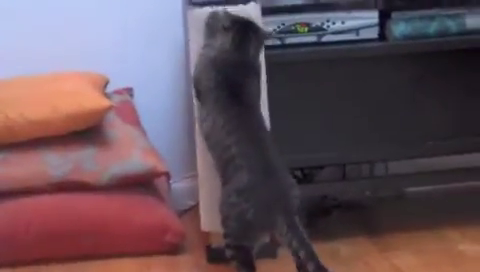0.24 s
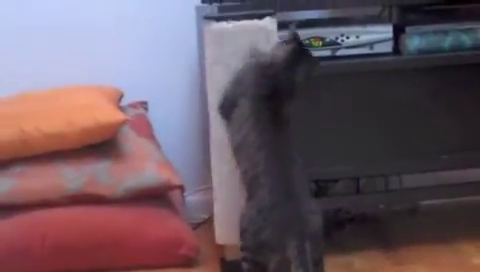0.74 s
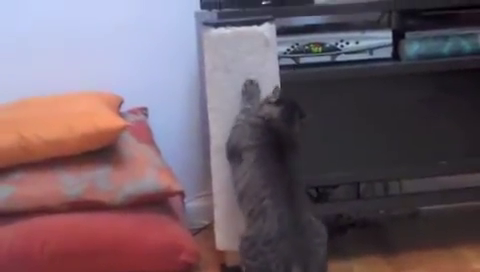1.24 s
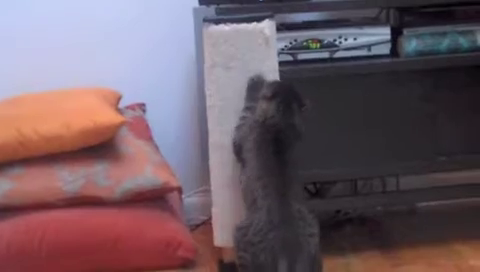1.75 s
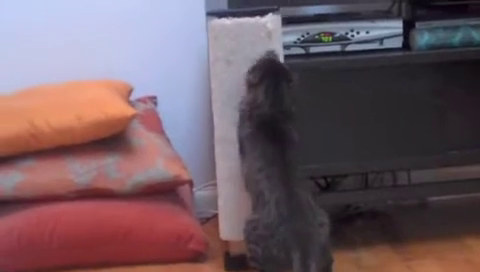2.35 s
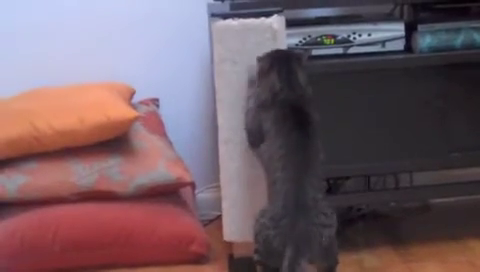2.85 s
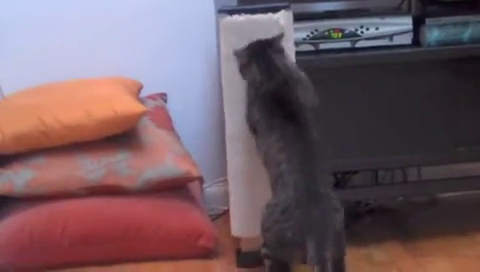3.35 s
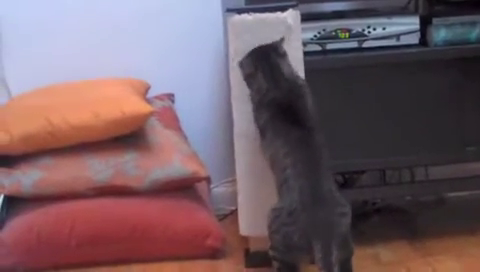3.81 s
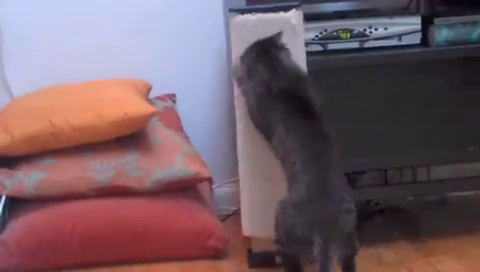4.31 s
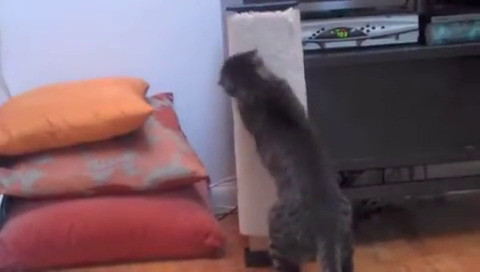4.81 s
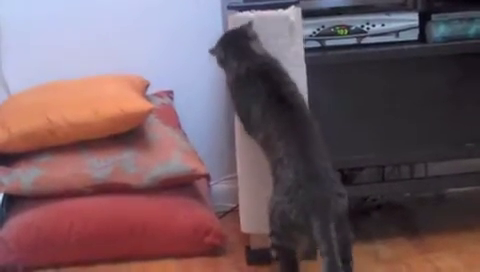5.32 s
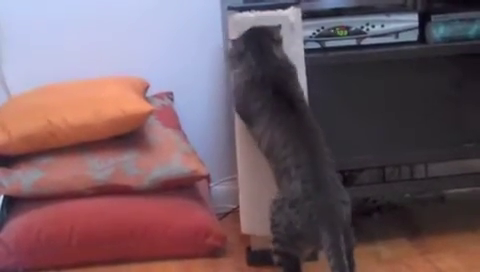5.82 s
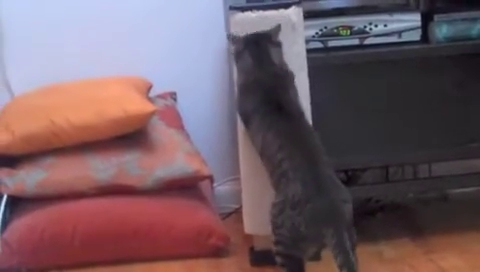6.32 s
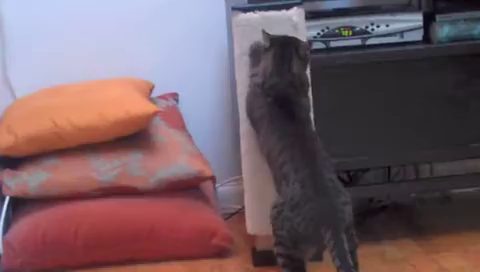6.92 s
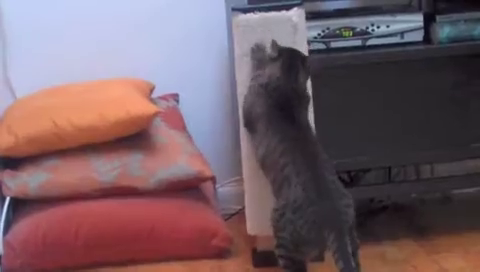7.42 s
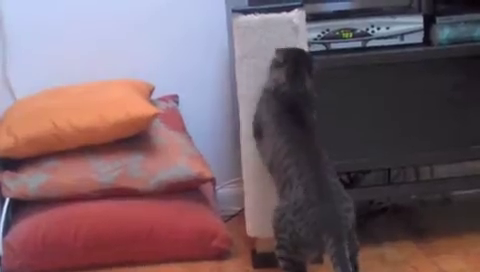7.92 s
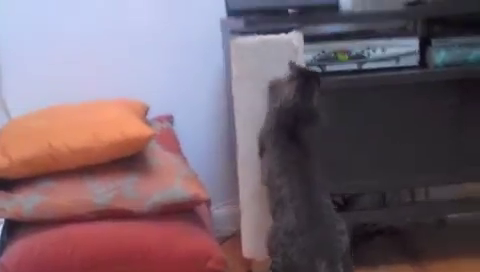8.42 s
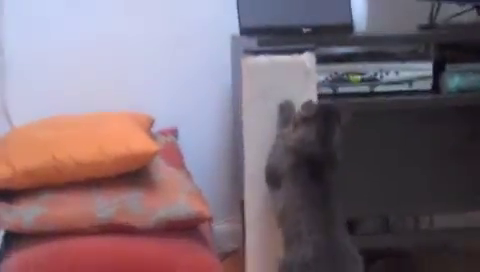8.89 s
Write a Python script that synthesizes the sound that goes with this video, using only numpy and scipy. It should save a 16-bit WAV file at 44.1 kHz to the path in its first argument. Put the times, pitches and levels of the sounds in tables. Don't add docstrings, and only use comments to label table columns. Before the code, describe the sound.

A cat claws a carpeted post indoors: irregular snaps and ticks of catching claws, hollow woody thumps, faint fibre scuffs, over quiet room hush.

```python
import sys
import numpy as np
from scipy import signal
from scipy.fft import rfft, irfft
from scipy.io import wavfile
from scipy.ndimage import uniform_filter1d

SR = 44100
rng = np.random.default_rng(int(sys.argv[2]) if len(sys.argv) > 2 else 0)


def materialize(psi):
    bounded = np.clip(np.atleast_2d(psi).T, -1, 1)
    quanta = np.round(bounded * 32767).astype(np.int16)
    wavfile.write(sys.argv[1], SR, quanta)


def ratio(d):
    e = np.asarray(d, float) / 20
    return 10 ** e


N = 403515

# start_s, blow_db, edge_db, cabinet_boom_db, length_ms
PULLS = [
    (0.249, -14, -18.5, -32, 6.8),
    (0.861, -6.5, -18.5, -39, 3.3),
    (2.8702, -12.5, -10, -35, 3.1),
    (3.4907, -10.5, -14.5, -36.5, 2),
    (4.283, -13, -14.5, -35.5, 6.9),
    (5.461, -15, -15, -40, 2),
    (6.116, -15, -17, -36.5, 2.1),
    (8.43, -10, -14, -35, 1.8),
]
# start_s, blow_db, board_db, edge_db, cabinet_boom_db
PAWS = [(0.001, -32.5, -16, -12.5, -35), (0.034, -37, -13, -21, -15), (1.692, -27.5, -16, -27, -42),
        (1.817, -40, -32, -1.5, -26), (1.989, -40.5, -6.5, -11, -36), (2.17, -28.5, -11, -10, -38),
        (2.473, -38, -9.5, 0.5, -28), (2.605, -35, -12, 2, -20), (4.241, -29, -17, -4.5, -35),
        (4.603, -35, -20, -5, -16), (4.667, -31.5, -11, -7.5, -34), (5.133, -27, -22, -8, -35),
        (5.1937, -32, -15.5, 0, -27), (6.091, -25, -24, -4.5, -37), (7.156, -31.5, -6.5, -9, -26),
        (7.711, -32.5, -26, -3, -29), (7.888, -28.5, -10, -9, -54), (8.15, -33, -13.5, -4.5, -29),
        (8.195, -34.5, -9, -9.5, -33), (8.384, -29, -14.5, -8, -21)]
SLID_DOWN_S = 1.2


def evened(x):
    return x / np.sqrt(np.mean(x ** 2) + 1e-20)


def read(points, hz):
    f, value = np.transpose(points)
    return np.interp(np.log(hz + 1), np.log(f + 1), value)


def over_time(points):
    s, level_db = np.transpose(points)
    return ratio(np.interp(np.arange(N) / SR, s, level_db))


def add(mix, s, sound):
    part = mix[max(round(s * SR), 0):][:len(sound)]
    part += sound[:len(part)]


def high_pass(x, order, hz):
    return signal.sosfilt(signal.butter(order, hz, "high", fs=SR, output="sos"), x)


def causal(gain_db):
    hz = abs(np.fft.fftfreq(4096, 1 / SR))
    log_gain = np.log(ratio(np.maximum(gain_db(hz), -100)))
    return np.fft.ifft(np.exp(np.conj(signal.hilbert(log_gain)))).real[:2048]


def ringing(modes, seconds):
    t = np.arange(round(seconds * SR)) / SR
    x = sum(ratio(db) * np.exp(-np.pi * width * t) * np.sin(2 * np.pi * hz * t) for hz, width, db in modes)
    return x / np.linalg.norm(x)


def ticks():
    # start_s, peak_db, pitch_hz, fade_cycles
    twangs = [(0.2512, -17, 3900, 3.6), (0.2534, -21, 5170, 3.6), (0.255, -18, 1800, 1.8),
              (0.8618, -3, 3000, 1.5), (0.8632, -11.5, 1490, 1.7), (0.8666, -2.5, 4480, 0.89),
              (0.8772, -9, 2200, 1.4), (1.6972, -33, 4470, 3), (1.713, -27, 3570, 2.5),
              (2.604, -29, 3300, 3), (2.6052, -23, 4420, 1.5), (2.6067, -31, 2640, 2.5),
              (2.6062, -34.5, 1470, 3), (2.6126, -25, 3900, 3), (2.6128, -26.5, 5950, 3.3),
              (2.6158, -26, 3600, 1.3), (2.6195, -43, 4200, 3), (4.2354, -29, 1700, 2),
              (4.5925, -37, 990, 1.7), (5.1318, -29, 1610, 3), (5.1323, -29, 5000, 1.5),
              (5.137, -31, 4940, 4), (5.1393, -24, 1600, 2.7), (5.1405, -25, 4660, 1.9),
              (5.1438, -25, 5250, 2.4), (5.1498, -30, 1510, 2.3), (5.15, -30, 4570, 2.7),
              (5.1917, -29, 1610, 3.6), (5.198, -28, 5240, 2.7), (6.0895, -24, 1690, 3.3),
              (6.0894, -23, 4340, 2.7), (6.095, -24, 2920, 3), (6.0952, -26, 1500, 4),
              (6.0992, -26, 4580, 3), (6.099, -27, 1600, 3), (7.7089, -28.5, 1170, 1.3),
              (7.7095, -31, 2770, 1.7), (7.8595, -31.5, 5700, 3), (7.859, -34, 2580, 3),
              (7.8905, -28, 1890, 2.8), (8.15, -32, 3200, 1.8), (8.1638, -41, 3280, 2.8),
              (8.169, -34, 1200, 1.6), (8.202, -23.5, 750, 2), (8.3853, -20, 1720, 1.5),
              (2.5958, -35, 3060, 5), (5.1925, -33, 3000, 1.8), (8.7075, -41, 6600, 2.7),
              (8.838, -48, 6200, 3), (8.961, -49, 8300, 4)]
    # delay_ms, level_db
    tick_echoes = [(.8, -7), (1.7, -15), (2.8, -15), (15.5, -18)]
    ring_cycles, ring_pitch_hz, ring_power = .46, 3500, .2
    after_db, after_cycles = -7, 1.7
    twang_room_db = -7.5
    near, far, t = np.zeros(N), np.zeros(N), np.arange(400) / SR
    for s, db, hz, room_db in claws():
        age = t * hz / (ring_cycles * (hz / ring_pitch_hz) ** ring_power)
        wave = np.cos(2 * np.pi * hz * t)
        snap = wave * (age * np.exp(-age)) ** 3
        snap = ratio(db - 1.5) * snap / abs(snap).max()
        after = ratio(after_db) * np.minimum(age / 2, 1) * np.exp(-t * hz / after_cycles) * wave
        add(near, s, snap + ratio(db) * after)
        add(far, s, ratio(room_db + 5.5) * snap)
    near, far = high_pass([near, far], 2, 1900)
    for s, db, hz, cycles in twangs:
        twang = ratio(db) * np.exp(-t * hz / max(cycles, .3)) * np.sin(2 * np.pi * hz * t)
        add(near, s, twang)
        add(far, s, ratio(twang_room_db) * twang)
    near, far = high_pass([near, far], 3, 800)
    room = tail(start_ms=0.52, rise_ms=2.3, early_db=5.0, lumpy_db=4.0)
    return through(near, echoes(tick_echoes)) + through(far, room)


def claws():
    # start_s, peak_db, pitch_hz, room_share_db
    snaps = [(0.0104, -29, 3230, -12), (0.0191, -14.5, 2740, -4), (0.0237, -22, 6240, -7),
             (0.2216, -20, 2780, 2.5), (0.6164, -22.5, 3550, -22), (0.7003, -32, 4070, -2),
             (0.8106, -11.5, 3400, -8), (1.6926, -20, 2900, 1), (2.4732, -22, 3060, -30),
             (2.5971, -36, 3480, -3), (2.8303, -25.5, 3150, -2), (3.3434, -29.5, 4180, -12),
             (3.3535, -30, 3900, -14), (3.4488, -23, 3260, -1), (4.2436, -17.5, 3330, -23),
             (4.5918, -24, 4250, -8), (4.8085, -31, 4770, -8), (5.1473, -24.5, 3300, 1),
             (5.1922, -23, 3490, -6), (7.0445, -22.5, 4230, -2.5), (7.124, -23, 4040, -2),
             (7.1544, -29, 3550, -21), (7.8466, -33, 3330, 6), (7.8595, -34, 3930, -1),
             (7.8893, -27, 2890, -21), (8.1637, -36, 3540, 3.5), (8.3715, -21.5, 3100, -2),
             (8.38, -19.5, 2850, -21), (0.8138, -25, 6500, -15), (0.8603, -15, 4300, -18),
             (0.8622, 1, 5270, -20)]
    # start_s, length_ms, peak_db, pitch_hz, room_share_db
    rips = [(0.037, 2.7, -28, 3760, -12), (0.6073, 1.6, -24.5, 3600, -2.5), (0.755, 5.5, -28.5, 3880, -6),
            (0.799, 2.6, -32, 3520, 5.5), (1.6886, 4.9, -32, 3400, -19), (1.8172, 2.5, -27, 2880, -4),
            (2.17, 3.5, -26.5, 3560, -23), (2.334, 2.7, -40, 3040, -1), (3.3016, 11, -42, 4350, -19),
            (4.0348, 11.6, -44, 4370, -4), (4.2358, 10.4, -25.5, 4000, -4), (4.6028, 2.2, -20, 4930, -3),
            (4.6149, 2.6, -31, 4200, -8), (4.6674, 3.6, -29, 2780, -18), (6.9011, 2.4, -44.5, 4300, 1),
            (7.7072, 2.17, -22.5, 2820, -22)]
    # start_s, peak_db, pitch_hz
    pricks = [(0.075, -28, 3670), (0.4667, -32, 3770), (0.486, -33.5, 3830), (0.5376, -40, 3340),
              (1.5887, -44, 2750), (1.6145, -42, 2490), (1.6356, -38, 4130), (1.6656, -38, 4000),
              (1.9886, -34, 3160), (2.0684, -37, 4060), (2.0821, -32, 4000), (2.1244, -35.5, 3870),
              (2.566, -43, 3330), (3.1279, -36, 3030), (3.3955, -35, 3910), (3.9566, -39.5, 3870),
              (4.0845, -39, 4000), (4.19, -38.5, 4870), (4.587, -27, 4050), (5.4313, -44, 3430),
              (6.034, -36, 2930), (6.5518, -35.5, 2230), (6.6446, -35, 2080), (6.953, -46, 3960),
              (7.1102, -34, 2840), (7.424, -42, 2230), (8.044, -30, 4170), (8.1509, -44, 2700),
              (8.1954, -39, 2700), (8.353, -42, 2940)]
    prick_room_db = -1.5
    claw_gap_ms, claw_db_spread, claw_pitch_spread = 3.1, 3.0, .18
    out = snaps + [(*row, prick_room_db) for row in pricks]
    chances = rng.uniform(-1, 1, (len(rips), 8, 3))
    for (s, ms, db, hz, room_db), chance in zip(rips, chances):
        count = 1 + int(np.clip(round(ms / claw_gap_ms), 1, 7))
        uneven = .3 * chance[:count, 0] * np.sin(np.linspace(0, np.pi, count))
        place = (np.arange(count) + uneven) / (count - 1)
        for p, (_, louder, higher) in zip(place, chance):
            pitch_hz = hz * (1 + claw_pitch_spread * higher)
            out.append((s + p * ms / 1000, db + claw_db_spread * louder, pitch_hz, room_db))
    return out


def knocks():
    # pitch_hz, density_db per Hz
    post = [(65, -28), (110, -8), (428, -0.5), (589, -1), (677, 2), (763, -3.5), (913, 4), (1470, 4),
            (1770, 5.5), (2740, -1), (5400, -23), (9260, -30.5), (13000, -45.5)]
    # pitch_hz, density_db per Hz
    post_top = [(65, -33), (110, -10.5), (300, -8.5), (420, -4), (560, -10), (950, -2.5), (1070, -4),
                (1500, -6.5), (1660, -1.5), (2530, -8), (4340, -10), (9640, -29), (13000, -45)]
    # pitch_hz, share
    board = [(100, 1), (600, 1), (1100, 0)]
    # pitch_hz, share
    edge = [(2200, 0), (4500, 1), (16000, 1)]
    # pitch_hz, density_db per Hz
    claw_colour = [(1500, -38), (3500, 0), (6500, 15), (10000, 10.5), (16000, -44)]
    # pitch_hz, width_hz, level_db
    boom_modes = [
        [(50.5, 2.16, -2), (38.5, 2.4, -7)],
        [(63.5, 6.4, 15)],
    ]
    # delay_ms, level_db
    knock_echoes = [(2.8, 2), (4.1, -2), (5.3, -2), (7.2, -5), (15.5, -7), (18.3, 1), (22, -5), (34.5, -3)]
    pull_board_db = [-17.5, -18.5, -17.5, -18.5, -19.5, -18.5, -19, -16.5]
    plain_board_db, plain_edge_db = -23, -21
    paw_ms, paw_flick_db = 2.56, -5
    soft_below_db, softening, shadow_db = -15, .25, 5.5
    first_wall_ms, room_fill_ms = 3, 12
    near, flick, boom, *wood = np.zeros((6, N))
    claw = causal(lambda hz: read(claw_colour, hz))
    swing = ringing(boom_modes[0], .6) - ringing(boom_modes[1], .6)
    blows = [(s, db, board_db, edge_db, boom_db, ms)
             for (s, db, edge_db, boom_db, ms), board_db in zip(PULLS, pull_board_db)]
    blows += [(*paw, paw_ms) for paw in PAWS]
    for k, (s, db, board_db, edge_db, boom_db, ms) in enumerate(blows):
        colour = post_top if s < SLID_DOWN_S else post
        plain = np.linalg.norm(causal(lambda hz: read(colour, hz)))
        low_db, high_db = board_db - plain_board_db, edge_db - plain_edge_db
        blow = causal(lambda hz: read(colour, hz) + low_db * read(board, hz) + high_db * read(edge, hz))
        sound = ratio(db + 2.0) * signal.fftconvolve(chatter(ms), blow / plain)
        add(wood[k % len(wood)], s - .001, sound)
        add(near, s - .001, ratio(shadow_db + softening * min(db - soft_below_db, 0)) * sound)
        is_paw = k >= len(PULLS)
        add(flick, s - .001, ratio(db + edge_db + 4 + paw_flick_db * is_paw) * claw)
        add(boom, s, ratio(db + boom_db + 35.5) * swing)
    room = sum(through(spot, tail(first_wall_ms, room_fill_ms, early_db=5.0, lumpy_db=5.5)) for spot in wood)
    near = high_pass(near, 1, 350)
    return through(near, echoes(knock_echoes)) + ratio(15.5) * room + [flick, np.roll(flick, 1)] + boom


def chatter(ms):
    fade = np.exp(-1000 * np.arange(2048) / SR / max(ms, .3))
    chance, size = rng.random(2048), rng.standard_normal(2048)
    blows = np.append(1.2, (size * (chance < .15))[1:])
    for _ in range(4):
        z = rfft(blows * np.sqrt(fade))
        blows = irfft(z / abs(z))
    return blows[:1024]


def slaps():
    slap_ms, late_ms = .7, 1.05
    out, t = np.zeros(N), np.arange(400) / SR
    age = 1000 * t / slap_ms
    swell = (age * np.exp(1 - age)) ** 2
    for s, db, *_ in PULLS:
        hz, slap_db = (2700, -5) if s < SLID_DOWN_S else (1780, 0)
        add(out, s + late_ms / 1000, ratio(db + slap_db) * swell * np.sin(2 * np.pi * hz * t))
    return out


def panels():
    # pitch_hz, width_hz, level_db
    panel_modes = [(275, 5, -4), (337, 7, -4), (424, 6, -1), (665, 7, -1), (723, 7, -3), (819, 7, -3),
                   (905, 8, -2), (1320, 8, -4), (1552, 7, -2), (1717, 6, 0), (1752, 6, 1), (1878, 6, -1),
                   (2290, 6, -3), (2650, 6, -4)]
    panel_db, spread_db, rise_ms = 11, 4, 6
    out, t = np.zeros(N), np.arange(round(.3 * SR)) / SR
    rise = 1 - np.exp(-1000 * t / rise_ms)
    blows = PULLS + PAWS
    chances = rng.standard_normal((len(blows), len(panel_modes), 2))
    for (s, db, *_), chance in zip(blows, chances):
        modes = [(hz * (1 + .002 * a), width, own_db + spread_db * b)
                 for (hz, width, own_db), (a, b) in zip(panel_modes, chance)]
        add(out, s, ratio(db + panel_db) * rise * ringing(modes, .3))
    return out


def drag():
    # pitch_hz, density_db per Hz
    pile = [(1500, -15.5), (2800, -3.5), (4000, -0.5), (5500, -2), (8000, -10), (11000, -18.5),
            (15000, -50)]
    size = ratio(9.2 * np.minimum(rng.exponential(1, N), 5)) * rng.choice([-1., 1.], N)
    clicks = size * (rng.random(N) < 1500 / SR)
    hiss = signal.oaconvolve(clicks, causal(lambda hz: read(pile, hz)))[:N]
    fibres = ratio(-1.5) * pressure() * evened(hiss)
    return 0.13 * fibres + through(fibres, tail(start_ms=2.8, rise_ms=8.3, early_db=-13.0, lumpy_db=7.5))


def pressure():
    # start_s, hold_s, level_db
    strokes = [(0.0, 0.01, -57), (0.27, 0.03, -57), (0.45, 0.3, -60.5), (0.88, 0.09, -59),
               (2.163, 0.035, -60), (2.403, 0.23, -62), (2.86, 0.038, -54.5), (3.303, 0.045, -55.5),
               (4.2, 0.32, -67.5), (5.477, 0.04, -60), (7.12, 0.11, -60.5), (7.906, 0.25, -62),
               (8.387, 0.077, -52.5), (8.75, 0.37, -64.5)]
    press_db_per_s, lift_db_per_s, resting_db = 91, 48, -68
    t = np.arange(N) / SR
    strokes_db = []
    for s, hold, db in strokes:
        below_db = np.maximum(press_db_per_s * (s - t), lift_db_per_s * (t - s - hold))
        strokes_db.append(db - np.maximum(below_db, 0))
    return ratio(np.maximum(np.max(strokes_db, axis=0), resting_db))


def swish():
    # middle_s, width_s, level_db (rms), low_hz, high_hz
    swells = [
        (0, 0.6, -73, 8000, 10500),
        (8.94, .12, -68, 8000, 11500),
    ]
    out = 0
    for s, width, db, low_hz, high_hz in swells:
        band_pass = signal.butter(2, [low_hz, high_hz], "band", fs=SR, output="sos")
        band = signal.sosfilt(band_pass, rng.standard_normal((2, N)))
        out = out + ratio(db) * evened(band) * np.exp(-((np.arange(N) / SR - s) / width) ** 2)
    return out


def hush():
    # pitch_hz, density_db per Hz
    hush_colour = [(15, -33), (25, 3), (113, -7), (136, -11), (187, -1.5), (372, -3), (511, -5), (554, 0),
                   (616, -6.5), (824, -3), (966, -3), (1560, -8.5), (2140, -13.5), (11900, -42.5),
                   (14000, -40)]
    # time_s, level_db
    hush_level = [(0.0, -49.5), (1.02, -49.5), (1.15, -52.5), (1.45, -54.5), (2.14, -50.5), (2.34, -54.5),
                  (2.93, -51.5), (3.34, -55), (3.56, -51.5), (4.15, -54), (4.48, -51), (4.92, -53),
                  (6.47, -52), (8.21, -50), (8.41, -49), (8.77, -50.5), (9.15, -49.5)]
    whine_hz, whine_db = 7870, -86
    frames, hz = N // 512 + 5, np.fft.rfftfreq(2048, 1 / SR)
    a, b, c, d, patches = rng.standard_normal((frames, 1025, 5)).T
    patches = evened(uniform_filter1d(uniform_filter1d(patches, 14, 0), 7, 1))
    z = np.array([a + 1j * b, c + 1j * d]) * ratio(read(hush_colour, hz)[:, None] + 1.2 * patches)
    mid, side = evened(signal.istft(z, nperseg=2048, noverlap=1536)[1][:, :N])
    whine = np.sqrt(2) * ratio(whine_db) * np.sin(2 * np.pi * whine_hz * np.arange(N) / SR)
    return ratio(0.84) * over_time(hush_level) * spread(mid, side) + whine


def echoes(table):
    out = np.zeros((2, 2048))
    out[:, 0] = 1
    for ms, db in table:
        at = round(ms * SR / 1000) + rng.integers(0, 3, 2)
        out[[0, 1], at] += ratio(db)
    return out


def tail(start_ms, rise_ms, early_db, lumpy_db):
    # pitch_hz, t60_s
    decay = [(40, 0.3), (110, 0.5), (280, 0.56), (740, 0.52), (1940, 0.56), (5120, 0.52), (9000, 0.37),
             (14000, 0.15)]
    # pitch_hz, level_db
    air = [(8000, -3), (11000, 2), (13000, -3), (15000, -9.5)]
    taps = np.zeros((2, SR))
    at = np.arange(0, SR - 16, 16) + rng.integers(0, 16, (2, (SR - 1) // 16))
    np.put_along_axis(taps, at, rng.choice([-1., 1.], at.shape), 1)
    hz, t, z = signal.stft(taps, SR, nperseg=256)
    clumps = evened(uniform_filter1d(rng.standard_normal(z.shape[1:]), size=12, axis=0))
    fade_db = -60 * t / read(decay, hz)[:, None]
    level_db = fade_db + early_db * np.exp(-t / 0.0067) + lumpy_db * clumps * np.exp(-t / 0.17)
    taps = signal.istft(z * ratio(level_db), SR, nperseg=256)[1][:, :SR]
    taps = taps * np.clip((np.arange(SR) / SR * 1000 - start_ms) / rise_ms, 0, 1)
    z = rfft(taps)
    z /= np.sqrt(uniform_filter1d(abs(z) ** 2, size=70, axis=1))
    z = z * ratio(read(air, np.arange(z.shape[1])))
    taps = irfft(z, SR) * (np.arange(SR) < .8 * SR)
    return spread(*taps) / np.linalg.norm(taps[0])


def spread(mid, side):
    # pitch_hz, level_db
    side_width = [(60, -15), (110, -13), (200, -20.5), (380, -18), (700, -12), (1290, -10), (2380, -4.5),
                  (4400, -1), (8120, 2), (15000, -4)]
    side = irfft(rfft(side) * ratio(read(side_width, np.fft.rfftfreq(len(side), 1 / SR))), len(side))
    return np.array([mid + side, mid - side])


def through(x, response):
    return signal.fftconvolve(x[None], response, axes=1)[:, :N]


def scene():
    # delay_ms, level_db
    slap_echoes = [(2.8, -7), (5.3, -8), (7.4, -11), (15.7, -6), (18.3, -12), (32.5, -9), (34.5, -11)]
    post = ticks() + knocks() + through(slaps(), echoes(slap_echoes)) + panels()
    return post + drag() + swish() + hush()


def low_pass(x):
    return signal.sosfilt(signal.butter(12, 16460, fs=SR, output="sos"), x)


def record(dry):
    # pitch_hz, level_db
    lean_table = [(60, -2.0), (180, -1.5), (550, -0.8), (1650, -1.7), (4970, -0.5), (9500, -4), (14000, 0)]
    # pitch_hz, level_db
    mic = [(15, -13), (35, -3.5), (60, 0), (9000, -0.5), (12000, -2), (13800, -4), (15000, -12),
           (16500, -20)]
    lean = read(lean_table, np.fft.rfftfreq(N, 1 / SR)) / 2
    x = irfft(rfft(dry, axis=1) * ratio(np.array([lean, -lean])), N, axis=1)
    x = signal.oaconvolve(x, causal(lambda hz: read(mic, hz))[None], axes=1)[:, :N]
    return low_pass(x)


dry = scene()
out = record(dry)
materialize(out)
```